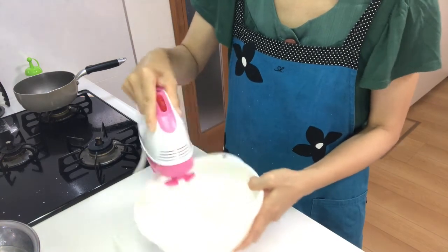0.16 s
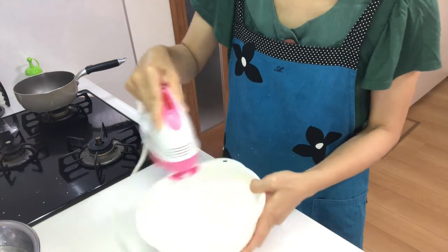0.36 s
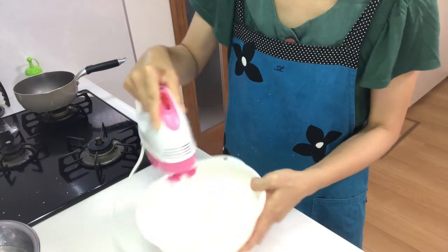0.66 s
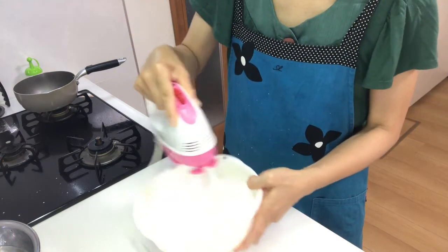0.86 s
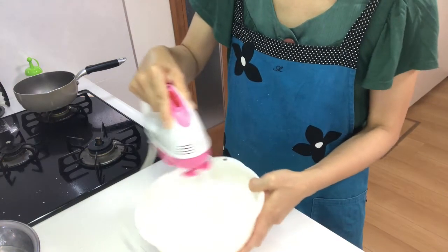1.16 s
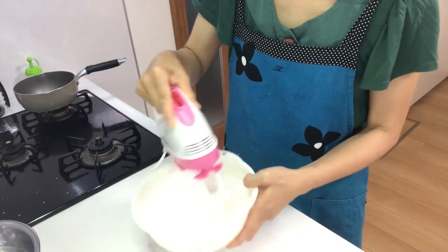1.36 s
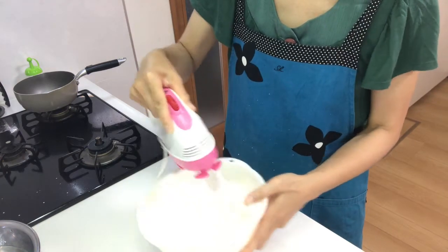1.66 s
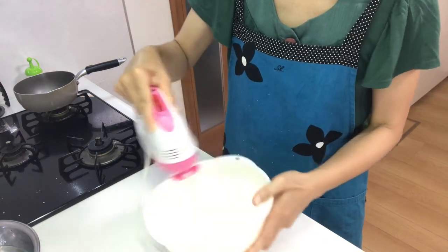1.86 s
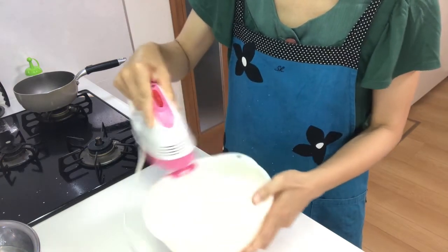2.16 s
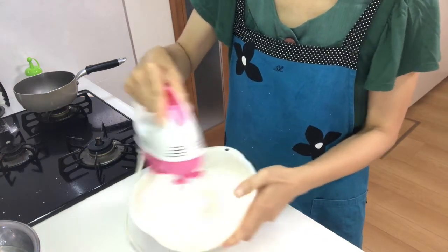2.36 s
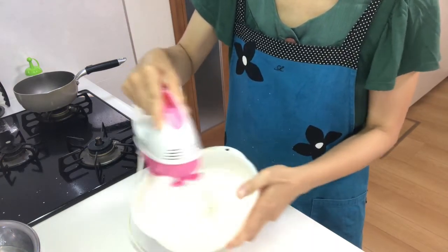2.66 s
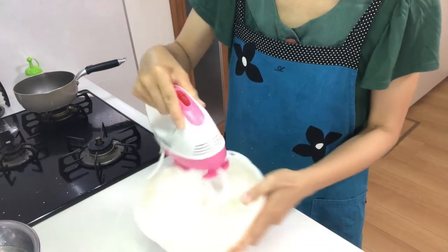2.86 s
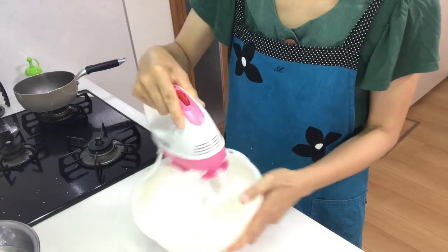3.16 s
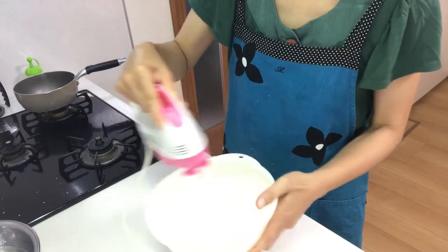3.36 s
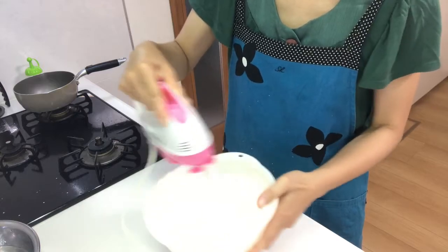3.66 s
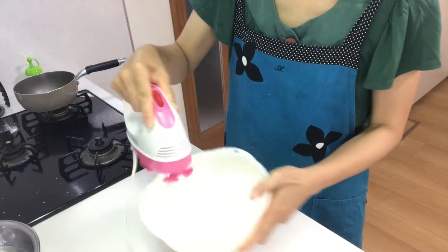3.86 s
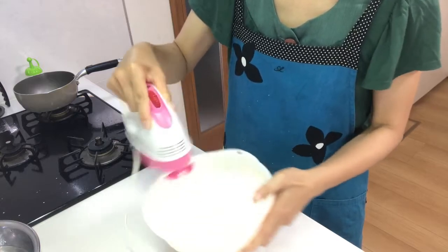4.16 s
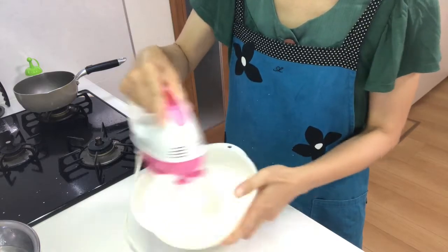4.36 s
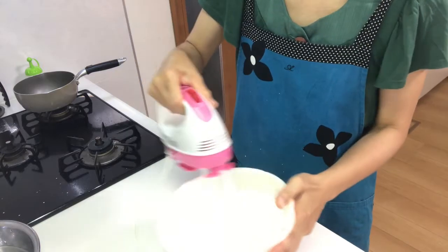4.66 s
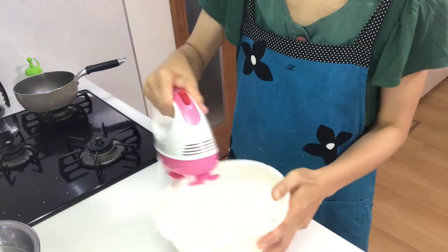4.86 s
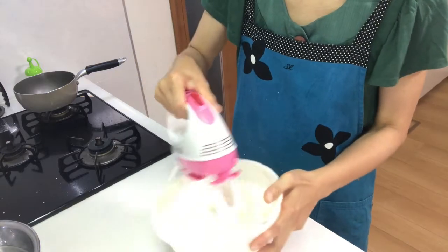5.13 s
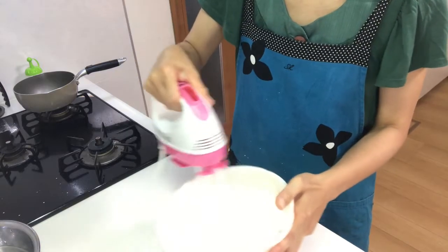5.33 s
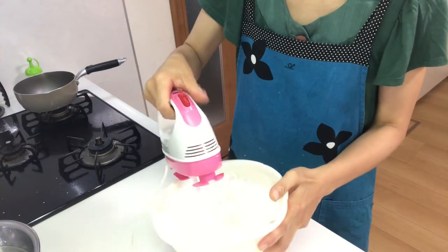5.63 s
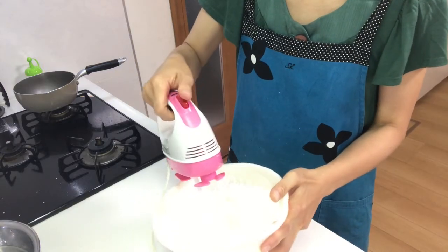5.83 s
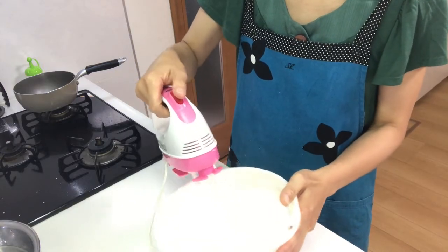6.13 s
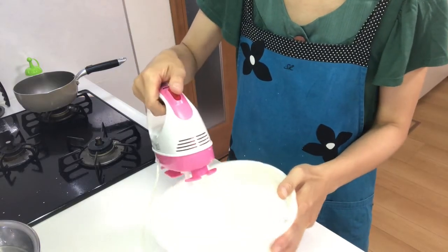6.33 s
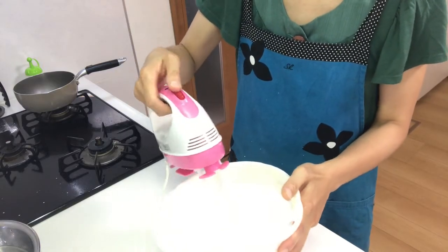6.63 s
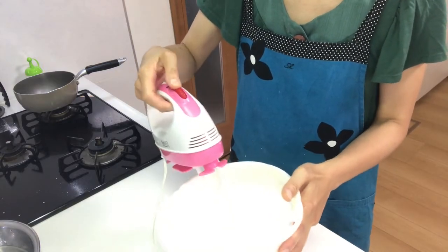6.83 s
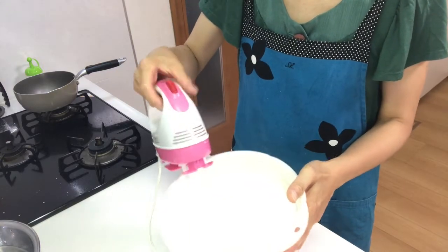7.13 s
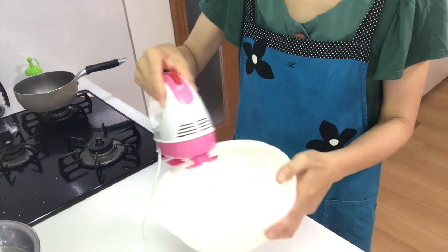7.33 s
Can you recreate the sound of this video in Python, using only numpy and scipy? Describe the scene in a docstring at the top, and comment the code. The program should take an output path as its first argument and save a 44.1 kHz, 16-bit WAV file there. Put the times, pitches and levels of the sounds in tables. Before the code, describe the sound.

Close, dry mono sound of a hand mixer in a bowl: a thin, fast, high-pitched whir pulsing with rapid strokes, then a brief dip and a much louder gritty roar at normal pitch. Beater wires clack against plastic and the bowl bumps the counter softly. A sharp click cuts power; the whine slides down among loosening knocks.

```python
"""A hand mixer whips batter in a plastic bowl, close to a mono microphone, in two shots joined by short fades.
The first shot plays at double speed, an octave up and quiet; the second at natural speed, loud enough to clip,
until the switch snaps off and the motor runs down. Noise and shaft orders from gears, fan, brushes and coils
ring the housing; noise bursts make the beater knocks and switch clicks. Damped sines make the counter bumps,
and a gliding sine makes a faint low drone; a short kitchen tail follows the knocks, over faint input hiss."""
import sys
import numpy as np
from scipy import signal
from scipy.fft import rfft, irfft, next_fast_len
from scipy.io import wavfile
from scipy.ndimage import uniform_filter1d

SR = 44100
rng = np.random.default_rng(int(sys.argv[2]) if len(sys.argv) > 2 else 0)


def transcribe(signal):
    """Save signal, clipped to [-1, 1], as a 16-bit WAV file at the path in sys.argv[1]."""
    frames = np.atleast_2d(signal).T
    limited = np.clip(frames, -1, 1)
    pcm = np.round(limited * 32767).astype(np.int16)
    wavfile.write(sys.argv[1], SR, pcm)


N = 330309

CUT_S, SWITCH_OFF_S = 4.474, 6.567
FADE_OUT_S, FADE_IN_S = 0.033, 0.13
FAST = 2  # playback speed of the first shot
TOP_HZ = 15700  # upper limit of the sound

# each shot under power: (fan air minus housing [dB], bass minus housing [dB], beater contact [dB])
FAST_RUN, SLOW_RUN = (-7.5, -23.3, -13), (-7.4, -20.5, -11)
# change while coasting for each halving of the shaft speed [dB]
COAST_ROAR_DB, COAST_AIR_DB, COAST_BASS_DB, COAST_CONTACT_DB = -9.5, -8.5, .6, 2.5
# housing roar under power: (time [s], level [dB])
HOUSING_ROAR = [(0, -24.5), (2.3, -25), (4.47, -25), (4.48, -10.5), (4.75, -11.5), (5.1, -11.5),
                (5.14, -13.5), (5.21, -14), (5.25, -11.3), (5.5, -13), (6.0, -11.7), (6.3, -11.8),
                (6.5, -10.5), (6.6, -11.5)]


def mixer(t, shaft, run, orders, speed, mid_hz, air_hz, bass_hz):
    """Source-filter principle: gear grit, wire strokes and whine drive the resonant housing."""
    hz = shaft_speed(t, shaft)
    halvings = np.log2(columns(shaft, t)[0] / hz)
    body_db = columns(HOUSING_ROAR, t)[0] + COAST_ROAR_DB * halvings
    coast_db = np.c_[[COAST_AIR_DB, COAST_BASS_DB, COAST_CONTACT_DB]] * halvings
    air_db, bass_db, contact_db = np.c_[list(run)] + coast_db
    unsteady_hz = hz * (1 + .0002 * walk(len(t), 30 * speed))
    turns = np.cumsum(unsteady_hz) / SR
    drive = gear_drive(t, turns, contact_db, speed)
    tones = whine(t, turns, orders, speed) + coil_whistle(t, turns, hz)
    sound = low_cut(housing(drive + np.sqrt(2) * tones, speed), speed)
    sound = fading_rings(sound, halvings)
    target_db = np.array([bass_db + body_db, body_db, air_db + body_db])
    roar = balance(t, sound, target_db, speed, (bass_hz, mid_hz, air_hz))
    hollow = throb(t, speed, body_db, hz=415, width=42, db=-21, lag=.05)  # air in the bowl
    rocking = throb(t, speed, body_db, hz=61, width=19, db=-29.5, lag=-.27)  # bowl rocking on the counter
    return roar + hollow + rocking


BRAKE_HZ_PER_S, DRAG_PER_S = 200, .16  # dry friction and drag
# motor shaft under power, as heard in each shot: (time [s], speed [turns/s])
FAST_SHAFT_SPEED = [(0, 721.5), (2.0, 717), (2.45, 719.5), (2.55, 712), (2.95, 710), (4.47, 707.5)]
SLOW_SHAFT_SPEED = [(4.47, 344.5), (5.3, 345.2), (6.567, 351)]


def shaft_speed(t, powered):
    """Rotational inertia: speed held by the current, then braked by dry friction and drag."""
    stall = BRAKE_HZ_PER_S / DRAG_PER_S
    coasting_s = np.maximum(t - SWITCH_OFF_S, 0)
    return (columns(powered, t)[0] + stall) * np.exp(-DRAG_PER_S * coasting_s) - stall


WIRES_PER_TURN = .205  # beater wires passing the bowl wall for each motor turn


def gear_drive(t, turns, contact_db, speed):
    """Friction excitation: gritty gear noise, modulated by each wire that scrapes the wall."""
    n = len(t)
    passed = turns * WIRES_PER_TURN
    wire = np.floor(passed).astype(int)
    size = undb(2.6 * np.clip(rng.standard_normal(wire[-1] + 1), -2, 2))[wire]
    scrape = size * np.exp(-(passed - wire) / 0.26) * 2.37
    grit = undb(1.14 * walk(n, 400 * speed))
    contact = undb(contact_db + 5.7 * stroke(t, 0)) * scrape
    drive = rng.standard_normal(n) * grit * np.sqrt(1 + contact ** 2)
    # steady the power over 0.15 s
    return drive / np.sqrt(uniform_filter1d(drive ** 2, int(.15 * SR)))


# hand sweeping the beaters round the bowl: (time [s], passes along the wall so far [count])
WALL_PASSES = [(0, 0), (1.43, 10), (2.48, 17), (4.47, 30), (4.65, 31), (5.0, 32), (5.36, 33), (6.5, 36),
               (7.49, 37)]
# how hard each pass presses on the wall: (time [s], pressure [0-1])
WALL_PRESSURE = [(0, .3), (1.6, .3), (1.87, .75), (2.8, .9), (4.35, .9), (4.65, .44), (5.0, .74),
                 (5.36, .7), (5.75, .1), (6.1, .17), (6.5, .5), (7.49, .03)]


def stroke(t, lag):
    """Periodic contact force: a smooth hump for each pass, delayed by lag in strokes."""
    phase = columns(WALL_PASSES, t)[0] - lag
    return np.clip(columns(WALL_PRESSURE, t)[0], 0, 1) * (.5 + .5 * np.cos(2 * np.pi * phase))


WAVER_DB = 2.5
# shaft orders of each shot: (multiple of shaft speed [ratio], level over the roar's drive before part changes
# and waver [dB], part [0 rotor, 1 fan blades, 2 slots, 3 bars])
FAST_WHINE = [(1, -21, 0), (2, -45, 0), (3, -30, 0), (4, -26.5, 0), (5, -18.5, 1), (6, -24.5, 2),
              (7, -27, 1), (8, -46, 2), (9, -17.5, 1), (10, -25, 2), (12, -17.5, 2), (18, -28, 3)]
SLOW_WHINE = [(3, -34, 0), (5, -19, 0), (9, -22, 1), (11, -28, 0), (12, -16, 2), (15, -29, 3), (18, -25, 3),
              (24, -21.5, 3), (25, -26, 0), (30, -26, 3), (36, -29, 3), (42, -31, 3)]


def whine(t, turns, orders, speed):
    """Rotational orders: rotor, fan and commutator sound at multiples of the shaft speed."""
    part_db = part_levels(t)
    total = 0
    for order, db, part in orders:
        level_db = db + part_db[part] + WAVER_DB * walk(len(t), 12 * speed)
        total = total + undb(level_db) * np.sin(2 * np.pi * order * turns)
    return total


# usual part levels, one row each for first shot, second shot, coasting:
# (rotor [dB], fan blades [dB], slots [dB], bars [dB])
PART_LEVELS = [(-.3, -.6, -.3, -.3), (-3.5, -.4, .6, -1.5), (-7, .3, -4, -.4)]
# passing swells and dips: (middle [s], length [s], part [0-3, as above], change [dB])
PART_SWELLS = [(3.4, 2.6, 1, -4), (2.3, .5, 2, -7), (3.9, 1.4, 2, -3), (6.8, .4, 3, -4), (5.95, .75, 0, 7),
               (5.65, .25, 1, -7), (5.8, .45, 2, -10), (6.36, .08, 2, -5), (6.68, .06, 2, 10.5),
               (6.95, .17, 1, 11.5), (7.11, .1, 1, 8), (7.36, .2, 2, 8), (7.42, .2, 1, 8), (7.36, .3, 3, 8)]


def part_levels(t):
    """Amplitude modulation: each part's usual level in dB plus smooth humps."""
    db = np.array(PART_LEVELS)[np.searchsorted([CUT_S, SWITCH_OFF_S], t)].T.copy()
    for s, length, part, change in PART_SWELLS:
        near = np.abs(t - s) < length
        db[round(part), near] += change * np.exp(-(2 * (t[near] - s) / length) ** 4)
    return db


# the level is the one reached at switch-off, before waver
MAGNETIC_ORDER, MAGNETIC_DB, MAGNETIC_RISE_DB_S = 36, -13, 3.5


def coil_whistle(t, turns, hz):
    """Magnetic excitation: a whistle that firms until the current stops, heard only below TOP_HZ."""
    level_db = MAGNETIC_DB + MAGNETIC_RISE_DB_S * (t - SWITCH_OFF_S)
    level_db = level_db + 0.8 * WAVER_DB * walk(len(t), 15)
    tone = undb(level_db) * np.sin(2 * np.pi * MAGNETIC_ORDER * turns)
    return tone * (t < SWITCH_OFF_S) * (MAGNETIC_ORDER * hz < TOP_HZ)


# broad colour at natural speed: (frequency [Hz], level per Hz [dB])
MIXER_COLOUR = [(15, -41), (25, -33.5), (174, -18), (240, -13.5), (483, -13.5), (667, -6), (784, -6),
                (1850, -2.5), (2070, 0.5), (2560, -4), (2930, -5), (4510, -5.5), (4890, -11), (6230, -11.5),
                (15600, -24)]
# resonances and dips of housing, bowl and counter at natural speed: (frequency [Hz], width [Hz], lift [dB])
BODY_RESONANCES = [(60.8, 23, 14.5), (243.3, 41, 10), (157, 22, 7), (365, 27, -5), (420, 25, 6),
                   (662.7, 45, 10.5), (883, 64, 4.5), (1056, 60, 5.5), (1284, 102, 8), (1520, 50, 3),
                   (1880, 95, 6), (2026, 125, -8), (2360, 34, 4.5), (2535, 90, 7), (2600, 70, 7),
                   (2960, 73, -3), (3350, 270, 5), (3780, 30, 4), (4570, 530, 2), (4960, 230, -7),
                   (5250, 310, 5.5), (6220, 220, 5), (9100, 520, 2.5), (10400, 850, -7)]


def housing(x, speed):
    """Minimum-phase resonance: a causal body response; faster playback lifts every frequency."""
    hz = np.maximum(np.fft.rfftfreq(16384, 1 / SR) / speed, 1)
    colour_hz, colour_db = np.transpose(MIXER_COLOUR)
    db = np.interp(np.log(hz), np.log(colour_hz), colour_db)
    for centre, width, lift in BODY_RESONANCES:
        db = db + lift / (1 + ((hz - centre) / (width / 2)) ** 2)
    # folding the cepstrum forward makes the response causal
    cepstrum = irfft(np.log(undb(db)))
    cepstrum[1:8192] *= 2
    cepstrum[8193:] = 0
    response = irfft(np.exp(rfft(cepstrum)))[:8192]
    return signal.fftconvolve(x, response)[:len(x)]


# rings of bowl and housing: (frequency [Hz], width [Hz], share lost for each halving of speed [ratio])
WALL_RINGS = [(243, 60, .8), (662, 50, .45), (2570, 220, 1.2), (1880, 100, .4), (3300, 500, .45)]


def fading_rings(sound, halvings):
    """Resonance loss: bowl and housing rings die away as the beaters slow."""
    for hz, width, lost in WALL_RINGS:
        ring = signal.lfilter(*signal.iirpeak(hz, hz / width, fs=SR), sound)
        sound = sound - np.clip(lost * halvings, 0, .9) * ring
    return sound


FLICKER_DB, STROKE_DB = 0.9, 1  # lone waver of each band; swell of the roar at full pressure


def balance(t, sound, target_db, speed, ranges_hz):
    """Spectral balance: load moves bass, body and air, and the moving hand shades each band."""
    n = len(t)
    power, f = np.abs(rfft(sound)) ** 2, np.fft.rfftfreq(n, 1 / SR)
    have_db = [10 * np.log10(2 * power[(f > lo) & (f < hi)].sum() / n ** 2) for lo, hi in ranges_hz]
    gains = target_db - np.array(have_db)[:, None]
    bass_hz, mid_hz, air_hz = ranges_hz
    anchors = np.log([bass_hz[1] / 2, mid_hz[0] * 2.4, mid_hz[1] * 0.47, air_hz[0] * 1.8])
    # weight of the bass, body and air gains at each anchor
    weights = [[0.81, 0.07, 0, 0.0056], [0.0089, 1, 1, 0.013], [0.017, 0, 0.0082, 0.89]]
    press, sway = stroke(t, 0), walk(n, 7 * speed)
    edges = 40 * 2 ** np.arange(0, 9, .67)
    out = np.zeros(n)
    for edge, band in zip(edges, split(sound, edges)):
        share = np.array([np.interp(np.log(edge), anchors, row) for row in weights])
        shade_db = STROKE_DB * press + 0.25 * sway + FLICKER_DB * walk(n, 14)
        out += band * undb(share @ gains + shade_db)
    return out


def throb(t, speed, body_db, hz, width, db, lag):
    """Forced resonance: narrow noise that sounds while the beaters press; db is relative to the housing."""
    peak = signal.iirpeak(hz * speed, hz / width, fs=SR)
    x = signal.lfilter(*peak, signal.lfilter(*peak, rng.standard_normal(len(t))))
    return x / x.std() * undb(body_db + db) * stroke(t, lag) ** 1.6


# treble crack relative to the peak of a knock at 2 kHz, natural speed; higher knocks crack harder
CRACK_FAST_DB, CRACK_SLOW_DB, CRACK_COAST_DB, CRACK_DB_PER_OCTAVE = -11, -17, -22, 8
# loudest knocks of a beater wire on the bowl: (time [s], body peak before tail and microphone [dB], centre [Hz])
WIRE_KNOCKS = [(1.86, -12.5, 5020), (2.091, -10, 4290), (2.308, -11, 5050), (2.469, -10, 5020),
               (2.618, -15, 5150), (2.789, -15, 2530), (2.929, -12, 2580), (3.071, -3.5, 4500),
               (3.239, -15, 3770), (3.38, -11, 5180), (3.549, -9, 5150), (3.691, -9, 3770),
               (4.001, -8, 5070), (4.169, -9, 3130), (4.313, -8, 3140), (4.642, -3, 2620), (4.949, 0, 1910),
               (4.975, -1, 1340), (4.999, -2.5, 1320), (5.011, 2, 2550), (5.025, 2.5, 3000),
               (5.079, .6, 2500), (5.279, -1.5, 2560), (5.314, -1.5, 1840), (5.327, 2, 2550),
               (5.342, 2, 2160), (5.368, .6, 7500), (6.828, -5, 1400), (6.9, -3, 2360), (6.94, -3, 2290),
               (7.002, -4, 1570), (7.076, -5, 1980), (7.113, -4, 1900), (7.145, -6, 2180),
               (7.185, .6, 1800), (7.211, -5, 1290), (7.237, -9, 1670), (7.286, -9.5, 1300),
               (7.326, -9, 867), (7.352, -10, 900), (7.379, -7, 1000), (7.409, -10, 1270)]


def knocks():
    """Impact excitation: a tick and short rattle ring bowl and housing, with a treble crack on top."""
    out, t = np.zeros(N + SR), np.arange(2048) / SR
    impulse = np.eye(1, len(t))[0]
    ring = {speed: housing(impulse, speed) for speed in (1, FAST)}
    treble = signal.butter(2, 6000, "high", fs=SR, output="sos")
    for s, peak_db, hz in WIRE_KNOCKS:
        low, high = rng.standard_normal((2, len(t)))
        speed = FAST if s < CUT_S else 1
        crack_db = CRACK_FAST_DB if s < CUT_S else CRACK_SLOW_DB if s < SWITCH_OFF_S else CRACK_COAST_DB
        crack_db += CRACK_DB_PER_OCTAVE * np.log2(hz / speed / 2000)
        push = low * np.exp(-t * speed / .003) + 4.5 * (t == 0)
        band = signal.butter(1, [hz / 2.2, min(hz * 1.7, 15000)], "band", fs=SR, output="sos")
        body = signal.sosfilt(band, signal.fftconvolve(push, ring[speed])[:len(t)])
        crack = signal.sosfilt(treble, high * np.exp(-t * speed / 0.0049))
        hit = body / np.abs(body).max() + undb(crack_db) * crack / np.abs(crack).max()
        i = int(s * SR)
        out[i:i + len(t)] += undb(peak_db) * hit
    return out[:N]


# slide switch snapping through its detents: (time [s], relative strength [dB])
SWITCH_CLICKS = [(6.567, 7), (6.6064, 4), (6.6493, -5)]
# modes of the plastic slider: (frequency [Hz], relative level [dB], 60 dB decay time [s])
SLIDER_MODES = [(5500, -8, .012), (7250, 0, .018), (9000, -8, .01), (11400, -4, .012), (12700, 0, .015),
                (13800, -3, .012), (15200, -3, .012)]


def switch():
    """Modal ringing: each detent rattles, rings the small plastic slider and leaves a short dry wash."""
    s, strength_db = np.transpose(SWITCH_CLICKS)
    push, t = bursts(s, undb(strength_db), 0.0023), np.arange(SR // 20) / SR
    ring = np.zeros(len(t))
    for hz, db, t60 in SLIDER_MODES:
        ring += undb(db) * np.sin(2 * np.pi * hz * t) * np.exp(-np.log(1000) * t / t60)
    slider = undb(-25.5) * signal.fftconvolve(push, ring)[:N]
    rattle = undb(-10) * np.diff(push, prepend=0)
    wash = np.diff(bursts(s, undb(strength_db - 23), .015), prepend=0)
    return slider + rattle + wash


# bowl bumping the counter: (time [s], amplitude before decay and microphone [dB])
COUNTER_BUMPS = [(4.639, -29), (4.81, -21), (4.999, -27), (5.159, -19), (5.362, -26), (7.289, -18)]


def bumps():
    """Damped oscillation: a soft 110 Hz push of little more than one cycle through the counter."""
    out, t = np.zeros(N + SR), np.arange(SR // 10) / SR
    push = np.sin(2 * np.pi * 110 * t) * np.exp(-t / 0.0048)
    for s, db in COUNTER_BUMPS:
        i = int(s * SR)
        out[i:i + len(t)] += undb(db) * push
    return out[:N]


DRONE_START_S, DRONE_ATTACK_S, DRONE_HOLD_S, DRONE_RELEASE_S = .36, .11, .49, .17
DRONE_FROM_HZ, DRONE_TO_HZ, DRONE_SLIDE_S, DRONE_DB = 112, 142.5, .11, -54


def drone(t):
    """Frequency glide: a lone low tone slides up, holds and fades."""
    since = np.maximum(t - DRONE_START_S, 0)
    hz = DRONE_TO_HZ + (DRONE_FROM_HZ - DRONE_TO_HZ) * np.exp(-since / DRONE_SLIDE_S)
    corners = np.cumsum([0, DRONE_ATTACK_S, DRONE_HOLD_S, DRONE_RELEASE_S])
    gate = np.interp(since, corners, [0, 1, 1, 0])
    return np.sqrt(2) * undb(DRONE_DB) * gate * np.sin(2 * np.pi * np.cumsum(hz) / SR)


def kitchen_tail(hits):
    """Diffuse reverberation: noise that falls 60 dB in 0.26 s follows each hit."""
    t = np.arange(SR // 3) / SR
    tail = rng.standard_normal(len(t)) * np.exp(-np.log(1000) * t / 0.26)
    return undb(-35) * signal.fftconvolve(hits, tail)[:N]


def input_hiss():
    """Broadband noise: a faint, steady white hiss."""
    return undb(-70) * rng.standard_normal(N)


def low_cut(x, speed):
    """High-pass response: the microphone drops the bass below 54 Hz times speed."""
    return signal.sosfilt(signal.butter(4, 54 * speed, "high", fs=SR, output="sos"), x)


def undb(db):
    """Logarithmic level: decibels to amplitude gain."""
    return 10 ** (np.asarray(db) / 20)


def columns(table, t):
    """Linear interpolation: the columns of a curve table at times t."""
    s, *cols = np.transpose(table)
    return [np.interp(t, s, c) for c in cols]


def walk(n, rate):
    """Random modulation: levels held 1 / rate s and slewed twice; spread near 1."""
    k = int(SR / rate)
    steps = np.repeat(rng.standard_normal(n // k + 1), k)
    return 1.28 * uniform_filter1d(uniform_filter1d(steps, k), k)[:n]


def decay(x, seconds):
    """Exponential damping: every sample of x dies away with this time constant."""
    return signal.lfilter([1], [1, -np.exp(-1 / (seconds * SR))], x)


def bursts(times, gains, seconds):
    """Impulsive excitation: decaying noise bursts with a sharp front."""
    hits = np.zeros(N)
    hits[(np.asarray(times) * SR).astype(int)] = gains
    return decay(hits, seconds) * rng.standard_normal(N) + 1.4 * hits


def split(x, edges_hz):
    """Filter-bank principle: bands that add up to x, with triangular crossovers on a log axis."""
    size = next_fast_len(len(x))
    spec, loghz = rfft(x, size), np.log(np.fft.rfftfreq(size, 1 / SR) + 1)
    shapes = [np.interp(loghz, np.log(edges_hz), row) for row in np.eye(len(edges_hz))]
    return [irfft(spec * shape, size)[:len(x)] for shape in shapes]


def scene():
    """Superposition: two shots end to end, with hits, kitchen tail, drone and hiss."""
    t = np.arange(N) / SR
    cut = int(CUT_S * SR)
    fast = mixer(t[:cut], FAST_SHAFT_SPEED, FAST_RUN, FAST_WHINE, FAST,
                 mid_hz=(1200, 7000), air_hz=(8000, 15000), bass_hz=(90, 900))
    slow = mixer(t[cut:], SLOW_SHAFT_SPEED, SLOW_RUN, SLOW_WHINE, 1,
                 mid_hz=(600, 3500), air_hz=(5000, 15000), bass_hz=(40, 450))
    hits = knocks()
    hits = hits + kitchen_tail(hits) + switch()
    fade = np.clip(np.maximum((CUT_S - t) / FADE_OUT_S, (t - CUT_S) / FADE_IN_S), 0, 1)
    sources = np.concatenate([fast, slow]) + low_cut(hits + bumps(), 0.92) + drone(t)
    mono = sources * fade + input_hiss()
    return np.array([mono, mono])


def record(dry):
    """Saturation and band limiting: peaks clip just under full scale, then the top is cut."""
    top_cut = signal.ellip(10, .2, 68, TOP_HZ, fs=SR, output="sos")
    return signal.sosfilt(top_cut, np.clip(dry, -.97, .97))


dry = scene()
out = record(dry)
transcribe(out)
```